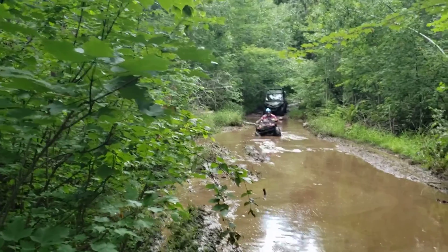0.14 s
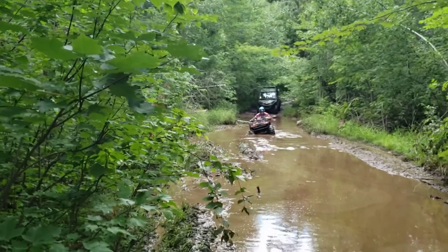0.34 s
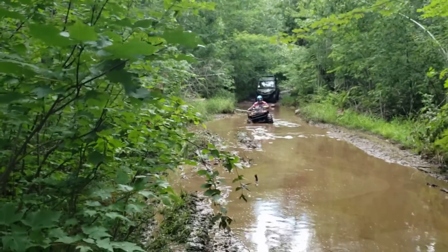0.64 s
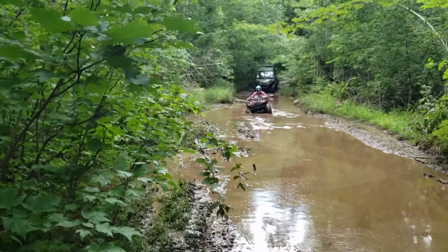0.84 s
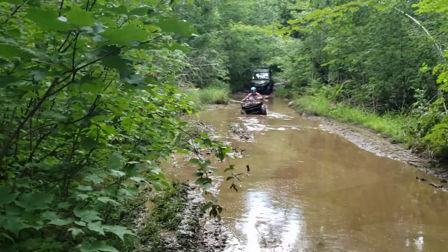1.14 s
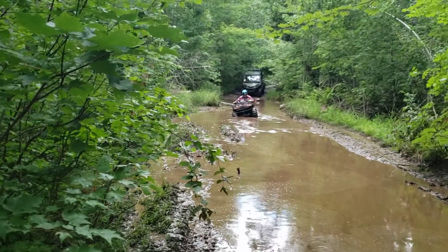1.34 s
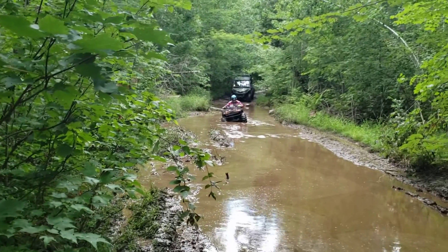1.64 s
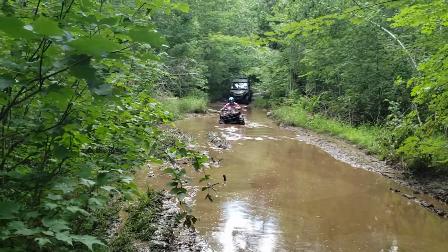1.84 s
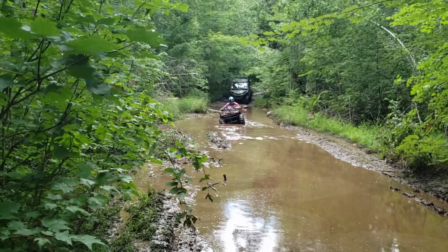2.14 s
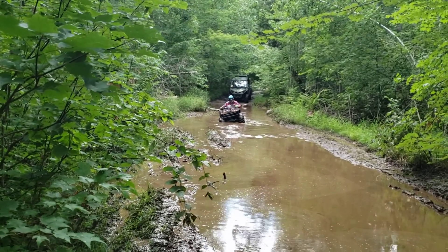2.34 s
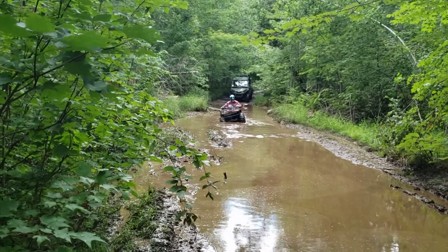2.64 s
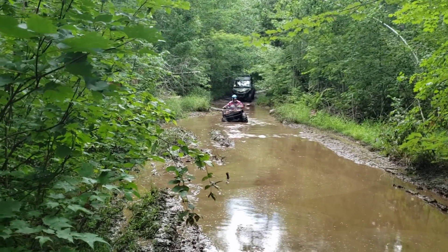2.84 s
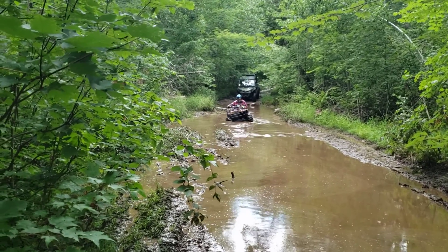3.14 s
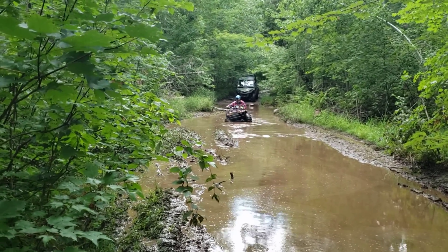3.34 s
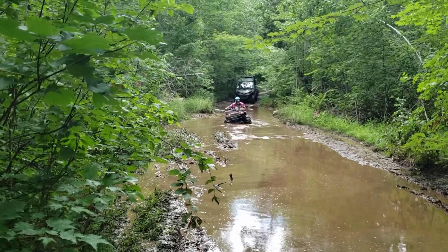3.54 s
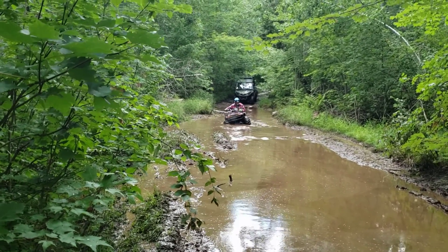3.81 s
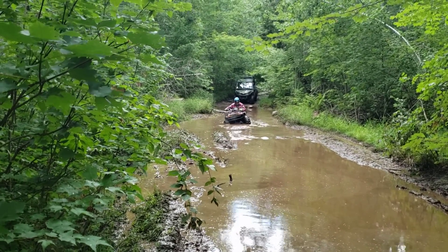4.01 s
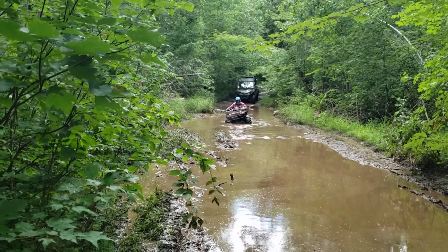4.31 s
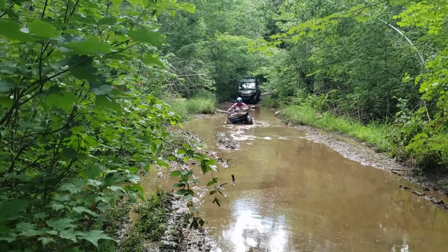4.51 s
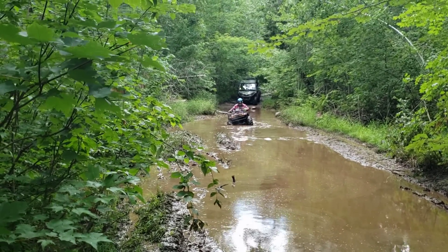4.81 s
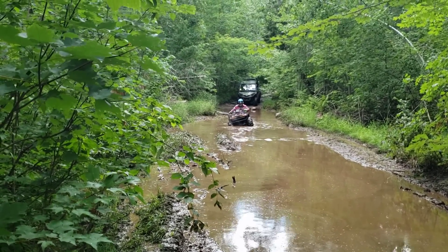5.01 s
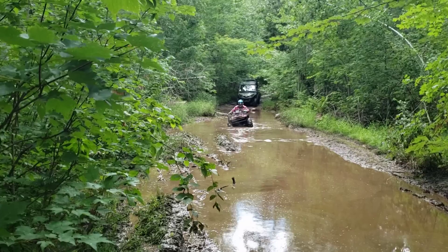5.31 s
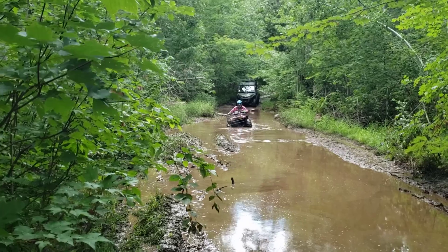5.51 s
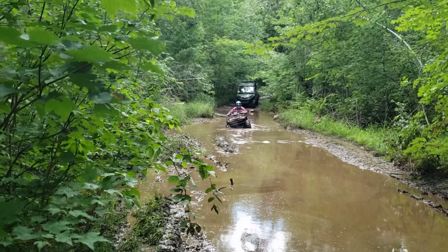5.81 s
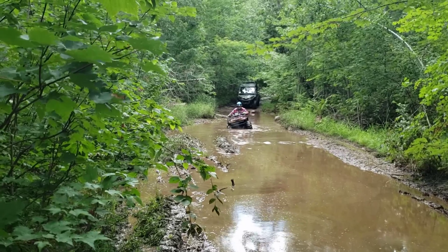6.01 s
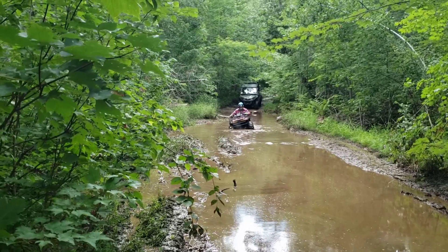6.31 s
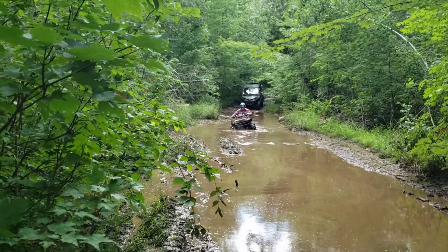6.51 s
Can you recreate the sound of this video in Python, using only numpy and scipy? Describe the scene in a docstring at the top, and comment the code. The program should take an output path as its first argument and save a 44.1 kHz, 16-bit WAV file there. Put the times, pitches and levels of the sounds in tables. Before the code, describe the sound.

Single-cylinder engine pulses through a flooded woodland track, its exhaust sinking to muffled knocks amid a water surge, over a buggy's low drone.

```python
"""A quad bike wades along a flooded forest trail, a twin-cylinder buggy behind it, heard from the bank.
First the quad's single cylinder thumps and barks under throttle through a mostly clear tailpipe, a pulse
train ringing a resonant pipe, with noise for gas; the buggy's drone, a sum of engine orders, climbs.
Near 2 s the throttle shuts, the pipe sinks and the churned water, shaped noise, surges; two more pushes
follow, then idle as the buggy's wash builds. Woods hiss and two thin whines, band noise, run throughout."""
import sys
import numpy as np
from scipy import signal
from scipy.fft import rfft, irfft
from scipy.io import wavfile

SR = 44100
rng = np.random.default_rng(int(sys.argv[2]) if len(sys.argv) > 2 else 0)


def digitize_waveform(pressure):
    """Quantize a signal to 16-bit integers and store it at the path in sys.argv[1].

    Rows of a 2-D input are taken as channels; values are limited to [-1, 1].
    """
    field = np.atleast_2d(pressure).T
    bounded = np.clip(field, -1, 1)
    quanta = np.round(bounded * 32767).astype(np.int16)
    wavfile.write(sys.argv[1], SR, quanta)


N = 293706
TIME = np.arange(N) / SR
FREQS = np.fft.rfftfreq(N, 1 / SR)


def amp(db):
    """Level law: decibels to amplitude ratio."""
    return 10 ** (np.asarray(db) / 20)


def unit(x):
    """Power normalization: scales to rms 1."""
    return x / np.sqrt(np.mean(x ** 2) + 1e-20)


def curves(rows, at=TIME):
    """Linear interpolation: each column of a timed table, read at the given times."""
    s, *columns = np.transpose(rows)
    return [np.interp(at, s, column) for column in columns]


def shape(points, hz):
    """Spectral envelope: interpolates a table along a log-frequency axis."""
    f, value = np.transpose(points)
    return np.interp(np.log(hz + 1), np.log(f), value)


def drift(hz):
    """Random modulation: slow chance of rms 1, with changes up to about hz a second."""
    knots = np.arange(0, N / SR + 1, .5 / hz)
    offset = rng.random() / hz
    return unit(np.interp(TIME, knots - offset, rng.standard_normal(len(knots))))


def arrive(x, lag_ms):
    """Interaural delay: sound from the trail reaches the left port a little after the right."""
    left, right = np.broadcast_to(x, (2, N))
    return np.array([np.interp(TIME - lag_ms / 1000, TIME, left), right])


def partly_alike(a, b, coherence):
    """Partial coherence: a pair of spectra sharing the given part of their amplitude."""
    return np.array([a, coherence * a + np.sqrt(1 - coherence ** 2) * b])


# likeness of diffuse sound at the two ports: frequency_hz, coherence (held to 0-1)
PORT_COHERENCE = [(100, 1.5), (500, 0.7), (1000, 0.71), (3000, 0.42), (8000, 0.04), (15000, 0)]


def hiss(spectrum, lag_ms=0.416):
    """Filtered noise: a spectral envelope on white noise, partly coherent at the two ports."""
    a, b = rfft(rng.standard_normal((2, N)))
    coherence = np.clip(shape(PORT_COHERENCE, FREQS), 0, 1)
    pair = partly_alike(a, b, coherence) * amp(shape(spectrum, FREQS))
    return arrive(unit(irfft(pair, N)), lag_ms)


def forest(x, t60, count=1500):
    """Multiple scattering: trunks and banks return decaying echoes, alike at both ports only in the bass."""
    delays_s = rng.uniform(.012, .5, (2, count))
    echoes = rng.choice([-1., 1.], delays_s.shape) * amp(-60 * delays_s / t60)
    taps = np.zeros((2, N))
    np.put_along_axis(taps, (delays_s * SR).astype(int), echoes, 1)
    a, b = rfft(taps / np.linalg.norm(taps[0]))
    coherence = 1 / (1 + (FREQS / 700) ** 2)
    tail = irfft(partly_alike(a, b, coherence), N)[:, :SR // 2]
    return signal.fftconvolve(np.atleast_2d(x), tail, axes=1)[:, :N]


# spectrum of leaves and far water: frequency_hz, level_db (relative)
WOODS_SPECTRUM = [(260, -23), (450, 0), (478, -14), (692, -8.5), (891, -12), (1370, -12), (2270, -16.5),
                  (3100, -17), (3440, -19), (3930, -18.5), (5060, -22), (5530, -19.5), (7330, -33),
                  (12100, -20), (15600, -30)]
WOODS_DB = -49


def woods():
    """Broadband turbulence: a soft, almost even hiss of leaves and far water."""
    return amp(WOODS_DB + .5 * drift(hz=2.0)) * hiss(WOODS_SPECTRUM, lag_ms=0.17)


def whine(hz, width_hz, db):
    """Narrow-band noise: a faint, thin tone whose envelope flutters at random."""
    band = np.exp(-((FREQS - hz) / width_hz) ** 2)
    tone = unit(irfft(rfft(rng.standard_normal(N)) * band, N))
    return arrive(amp(db) * tone, lag_ms=0.18)


# the buggy's engine speed: start_s, pitch_hz (engine cycles per second)
BUGGY_SPEED = [(0, 42), (1.4, 44), (1.8, 54), (2.12, 59.5), (2.5, 55), (2.9, 54.2), (3.35, 56), (3.8, 55.3),
               (4.0, 53.6), (4.25, 55.2), (4.6, 54.4), (5.15, 56.3), (5.4, 55.2), (6.3, 56.6), (6.66, 59.8)]
# resonances of the buggy's exhaust pipe: frequency_hz, level_db (relative)
BUGGY_PIPE_SPECTRUM = [(30, -79), (55, -16.5), (80, 0.5), (112, 0), (166, -10.5), (222, -16.5),
                       (278, -20.5), (335, -35.5), (390, -38), (445, -40.5), (520, -44.5), (760, -50),
                       (900, -64.5)]
# level at the reference speed, gain per doubling of speed, gain per second as it draws nearer
BUGGY_RATE_HZ = 55
BUGGY_DB, BUGGY_SPEED_DB, BUGGY_NEARING_DB_PER_S = -21.5, 10.5, 0.39


def buggy(count=14):
    """Engine orders: two firings a cycle favour even harmonics, which sweep the pipe's resonances."""
    hz = curves(BUGGY_SPEED)[0]
    level_db = BUGGY_DB + BUGGY_SPEED_DB * np.log2(hz / BUGGY_RATE_HZ) + BUGGY_NEARING_DB_PER_S * TIME
    unsteady = np.interp(hz, [40, 53], [.02, .002])
    angle = 2 * np.pi * np.cumsum(hz * (1 + unsteady * drift(hz=11.53))) / SR
    drone = np.zeros(N)
    for order in range(1, count + 1):
        waver_db = (.7 if order == 2 else 2.2) * drift(hz=6.4)  # wavers with the load
        order_db = shape(BUGGY_PIPE_SPECTRUM, order * hz) + waver_db
        order_db -= 2.45 * (order % 2)
        order_db += 1.6 * np.maximum(hz - 57, 0) * (order > 5)  # opening the throttle brightens the note
        drone += amp(order_db) * np.cos(order * angle + rng.uniform(0, 2 * np.pi))
    rumble = amp(-10.5) * hiss(BUGGY_PIPE_SPECTRUM, lag_ms=0.18)
    return amp(level_db) * (arrive(np.sqrt(2) * drone, lag_ms=0.23) + rumble)


# the buggy's wash: start_s, level_db
BUGGY_WASH_LEVEL = [(5, -60), (6.66, -49)]
# the quad's wash: level at cruising speed, gain per doubling of speed and in the shallows (pipe clear)
CHURN_DB, CHURN_SPEED_DB, CHURN_SHALLOW_DB = -50.5, 15, 5.5
CHURN_LAG_S = 0.15  # the water takes a moment to follow the wheels
# the surge as the quad plunges in: gain, delay of its peak after the pipe sinks, half-length
PLUNGE_DB, PLUNGE_LAG_S, PLUNGE_S = 6, 0.44, 0.52


def churn_level():
    """Flow noise grows with speed: the quad's wash follows its wheels and surges; the buggy's builds."""
    speed, _, shallow = riding(TIME - CHURN_LAG_S)
    plunge = np.exp(-((TIME - SINKS_AT_S - PLUNGE_LAG_S) / PLUNGE_S) ** 2)
    quad_db = CHURN_DB + CHURN_SPEED_DB * speed + CHURN_SHALLOW_DB * shallow + PLUNGE_DB * plunge
    return np.hypot(amp(quad_db), amp(curves(BUGGY_WASH_LEVEL)[0]))


# spectrum of churned water: frequency_hz, level_db (relative)
CHURN_SPECTRUM = [(200, -4), (500, 8.5), (1000, 2.5), (1400, 3), (2100, -1), (3200, -9.5), (5000, -10.5),
                  (7400, -26.5), (9100, -7.5), (10400, -21), (11900, -8), (13700, -21), (15600, -10)]
# single slaps of water: start_s, level_db (before the onset softens it), pitch_hz, decay_s
WATER_SLAPS = [(0.351, -24, 900, 0.003), (0.351, -26, 2300, 0.0022), (.368, -42, 3200, 0.03),
               (2.816, -36, 860, .012), (2.845, -32.5, 520, 0.02), (3.728, -32, 445, .012),
               (3.731, -36, 850, .012)]


def water():
    """Modulated turbulence: wheels churn a spattering noise, with a few impulsive slaps."""
    spatter = amp(1.2 * drift(hz=14) + 1.6 * drift(hz=180))
    wash = churn_level() * unit(spatter * hiss(CHURN_SPECTRUM))
    for start_s, level_db, pitch_hz, decay_s in WATER_SLAPS:
        age = np.maximum(TIME - start_s, 0)
        burst = (1 - np.exp(-age / .0005)) * np.exp(-np.minimum(age / decay_s, 30))
        spectrum = [(pitch_hz / 4, -30), (pitch_hz, 0), (pitch_hz * 2, -14), (pitch_hz * 10, -45)]
        wash += amp(level_db) * burst * hiss(spectrum)
    return wash


# the quad's engine speed: start_s, rate_hz (firings per second)
FIRING_RATE = [(0, 21.26), (.63, 23.81), (.99, 24.48), (1.79, 24.38), (2.03, 18.22), (2.32, 15.4),
               (2.72, 21.15), (3.41, 25.41), (3.71, 23.88), (3.98, 17.22), (4.23, 14.59), (4.46, 19.73),
               (4.7, 21.69), (4.82, 17.96), (5.15, 14.08), (5.74, 11.28), (6.66, 11.46)]


def firings():
    """Cyclic combustion: one firing each engine cycle, with more jitter when the engine is slow."""
    rate = curves(FIRING_RATE)[0]
    new_cycle = np.diff(np.floor(np.cumsum(rate) / SR)) > 0
    times = np.r_[0, TIME[1:][new_cycle]]
    stumble_s = np.interp(curves(FIRING_RATE, times)[0], [12, 16, 22], [.004, .0008, .00015])
    return times + stumble_s * rng.standard_normal(len(times))


# the rider's pushes of throttle: opens_s, shuts_s, depth (0-1)
THROTTLE_PUSHES = [(-.12, 1.86, 0.77), (2.35, 3.76, 1), (4.29, 4.7, 0.83)]
CRUISE_RATE_HZ = 24  # firings per second at which the quad's levels are given
# the throttle eases open, snaps shut (time constants) and rests slightly open at idle (0-1)
OPEN_S, SHUT_S, IDLE_THROTTLE = 0.089, .06, .12
# the tailpipe's sinking: its middle, its length, and how clear the pipe is before and after (0-1)
SINKS_AT_S, SINKING_S, CLEAR_BEFORE, CLEAR_AFTER = 1.98, .55, 0.81, 0.055


def riding(t):
    """First-order lag: speed in doublings above cruising, eased throttle 0-1, tailpipe clear of water 0-1."""
    speed = np.log2(curves(FIRING_RATE, t)[0] / CRUISE_RATE_HZ)
    push = 0
    for opens_s, shuts_s, depth in THROTTLE_PUSHES:
        opening = 1 - np.exp(-np.maximum(t - opens_s, 0) / OPEN_S)
        closing = np.exp(-np.maximum(t - shuts_s, 0) / SHUT_S)
        push = push + depth * opening * closing
    sunk = np.clip((t - SINKS_AT_S) / SINKING_S + .5, 0, 1)
    clear = CLEAR_BEFORE + (CLEAR_AFTER - CLEAR_BEFORE) * sunk
    return speed, np.clip(np.maximum(push, IDLE_THROTTLE), 0, 1), np.clip(clear, 0, 1)


# bouts of hard spitting, as the engine takes up load, peaks or runs on after a push:
# start_s, length_s, level_db (before each pop's own variation)
HARD_SPIT_BOUTS = [(1.93, .1, -36), (2.66, .1, -34.5), (3.16, .28, -34.5), (3.86, .16, -38),
                   (4.09, .05, -44), (4.35, .24, -35), (4.79, .11, -35)]


def hard_spit(times):
    """Intermittent discharge: the hard spit's strength at each firing, zero outside the bouts."""
    strength = 0
    for start_s, length_s, level_db in HARD_SPIT_BOUTS:
        during = (times >= start_s) & (times < start_s + length_s)
        strength = strength + amp(level_db) * during
    return strength


def blows(times, gains, uneven_db):
    """Impulse train: one push for each firing; no two burns are equally strong."""
    train = np.zeros(N)
    places = np.clip(times * SR, 0, N - 1).astype(int)
    train[places] = gains * amp(uneven_db * rng.standard_normal(len(times)))
    return train


def puffs(train, rise, decay, linger, linger_share):
    """Exponential discharge: gas escapes after each push in a quick burst and a lingering trail."""
    t = TIME[:SR // 5]
    burst = (1 - np.exp(-t / rise)) * (np.exp(-t / decay) + linger_share * np.exp(-t / linger))
    return signal.oaconvolve(train, burst / burst.max())[:N]


# spectrum of the rasp: frequency_hz, level_db (relative)
RASP_SPECTRUM = [(250, -23.5), (500, 5), (720, 9), (1000, 7), (1400, -4), (1800, 5), (2300, 4),
                 (2650, -4.5), (3200, -3.5), (4900, -7.5), (7300, -17.5), (9200, -20), (12000, -12.5),
                 (16000, -12.5)]
# spectrum of the spit: frequency_hz, level_db (relative)
SPIT_SPECTRUM = [(300, -17), (520, -0.5), (750, 17.5), (1100, -4), (2200, -16.5), (3300, -4.5), (5200, 1),
                 (7400, -17.5), (9200, 2), (10300, -8.5), (12000, 8), (13800, -9), (15600, -2.5)]
# level of the rasp; gains per doubling of speed, by full throttle and by a clear tailpipe
RASP_DB, RASP_SPEED_DB, RASP_LOAD_DB, RASP_CLEAR_DB = -58.5, 4.5, 7, 9
# level of the light spit on every firing; gain by full throttle
SPIT_DB, SPIT_LOAD_DB = -57, 16


def quad_gas(times):
    """Pulsed jet noise: gas rasps at each firing and spits sharply; off the throttle the spit comes twice."""
    speed, throttle, clear = riding(times)
    rasp_db = RASP_DB + RASP_SPEED_DB * speed + RASP_LOAD_DB * throttle + RASP_CLEAR_DB * clear
    rasp_blows = blows(times - .0004, 1., uneven_db=1.84)
    rasp_puffs = puffs(rasp_blows, rise=0.0047, decay=0.0021, linger=0.02, linger_share=0.1)
    rasp = unit(rasp_puffs) * amp(np.interp(TIME, times, rasp_db)) * hiss(RASP_SPECTRUM)

    strength = np.maximum(amp(SPIT_DB + SPIT_LOAD_DB * throttle), hard_spit(times))
    coasting = 1 - throttle
    pops = blows(times + 0.00095, strength * (1 - 0.2 * coasting ** 2), uneven_db=0.9)
    pops += blows(times - .006, 0.95 * strength * coasting ** 4, uneven_db=1.5)
    crackle = unit(amp(4.3 * drift(hz=2500)) * hiss(SPIT_SPECTRUM))
    spit = puffs(pops, rise=0.001, decay=.0017, linger=0.016, linger_share=0.06) * crackle
    gas = rasp + spit
    return gas + amp(-14) * forest(gas, t60=.4)


def ringing(power):
    """Minimum phase: the causal ring of a body with this power spectrum over the full frequency circle."""
    log_gain = np.log(power) / 2
    response = np.exp(np.conj(signal.hilbert(log_gain)))
    return np.fft.ifft(response).real[:len(power) // 2]


# the exhaust thump under load: frequency_hz, level_db (relative)
LOADED_THUMP = [(14, -65.5), (32, -23.5), (47, -7.5), (72, -15.5), (100, -5), (124, 3), (148, 3),
                (168, -13.5), (188, -14), (250, -27), (360, -30), (540, -50), (1000, -56), (3000, -110)]
# the exhaust thump when coasting: frequency_hz, level_db (relative)
COASTING_THUMP = [(14, -74), (32, -34.5), (46, -3.5), (68, -6.5), (90, 5.5), (125, -9), (170, -13),
                  (230, -19.5), (290, -16), (370, -46.5), (700, -44.5), (3000, -110)]
# the bark of the open tailpipe at cruising speed: frequency_hz, level_db (relative)
OPEN_BARK = [(60, -75), (240, -32.5), (315, -16.5), (390, -18), (500, -30.5), (660, -39.5), (780, -46),
             (845, -31.5), (920, -37), (1100, -40.5), (1700, -57), (2100, -46), (2550, -42.5), (3200, -60),
             (8000, -110)]
# the hollow knock of the tailpipe under water: frequency_hz, level_db (relative)
SUBMERGED_KNOCK = [(70, -75), (210, -23.5), (280, -12), (345, -26), (430, -43), (560, -44), (690, -25.5),
                   (790, -33), (1000, -44.5), (1700, -63), (2270, -48), (2700, -75.5), (8000, -110)]
# level of the thump; gains per doubling of speed, by full throttle, by a clear tailpipe
THUMP_DB, THUMP_SPEED_DB, THUMP_LOAD_DB, THUMP_CLEAR_DB = -25.5, 6.5, 3.5, 4
THUMP_POP_DB = 1.5  # gain by popping with the throttle shut
BARK_RISE = 0.43  # faster running heats the gas: octaves per doubling of speed


def quad_exhaust(times, size=4096):
    """Pipe resonance: each firing rings the silencer, barking in air and knocking hollow under water."""
    hz = abs(np.fft.fftfreq(size, 1 / SR))
    rates = curves(FIRING_RATE, times)[0]
    poppings = hard_spit(times) > 0
    pipe = np.zeros(N + size)
    for s, rate, popping, speed, throttle, clear in zip(times, rates, poppings, *riding(times)):
        level_db = THUMP_DB + THUMP_SPEED_DB * speed + THUMP_LOAD_DB * throttle
        level_db += THUMP_CLEAR_DB * clear + THUMP_POP_DB * popping * (1 - throttle)
        heat, burn = rng.standard_normal(2)
        tuned = hz * (1 + 0.02 * heat)  # the gas heat of each firing shifts the resonances
        states = [(LOADED_THUMP, tuned, throttle),
                  (COASTING_THUMP, tuned, (1 - throttle) ** 2),
                  (OPEN_BARK, tuned / 2 ** (BARK_RISE * speed), clear ** 2),
                  (SUBMERGED_KNOCK, tuned, throttle * (1 - clear) ** 3)]
        power = sum(share * amp(shape(spectrum, at)) ** 2 for spectrum, at, share in states)
        thump = ringing(power)
        thump *= np.sqrt(SR / rate) / np.linalg.norm(thump)  # rms 1 over one engine cycle
        start = max(int((s - .003) * SR), 0)
        pipe[start:start + len(thump)] += amp(level_db + 1.4 * burn) * thump
    pipe = pipe[:N]
    return arrive(pipe, lag_ms=.42) + amp(-12) * forest(pipe, t60=.3)


def scene():
    """Superposition: both vehicles, the water, the woods and two thin whines add together."""
    times = firings()
    whines = whine(hz=1168, width_hz=27, db=-67.5) + whine(hz=3840, width_hz=58, db=-66)
    return woods() + whines + buggy() + water() + quad_gas(times) + quad_exhaust(times)


# balance of the two ports: frequency_hz, level_db (left minus right)
PORT_BALANCE = [(100, 0), (700, -.5), (1500, -1), (2500, -1.5), (4000, -3), (6000, -8), (7500, -1.5),
                (9200, -12), (12000, -11.5), (15500, -16.5)]
CUTOFF_HZ = 15900


def record(dry):
    """Linear filtering: the left port is duller than the right; then a low-pass limits the band."""
    ports = amp(shape(PORT_BALANCE, FREQS) * np.array([[.5], [-.5]]))
    ports /= np.sqrt(np.mean(ports ** 2, axis=0))  # keeps the mean power of the pair
    heard = irfft(rfft(dry) * ports, N)
    lowpass = signal.firwin(801, CUTOFF_HZ, window=("kaiser", 9), fs=SR)
    return signal.oaconvolve(heard, lowpass[None], "same")


dry = scene()
out = record(dry)
digitize_waveform(out)
```